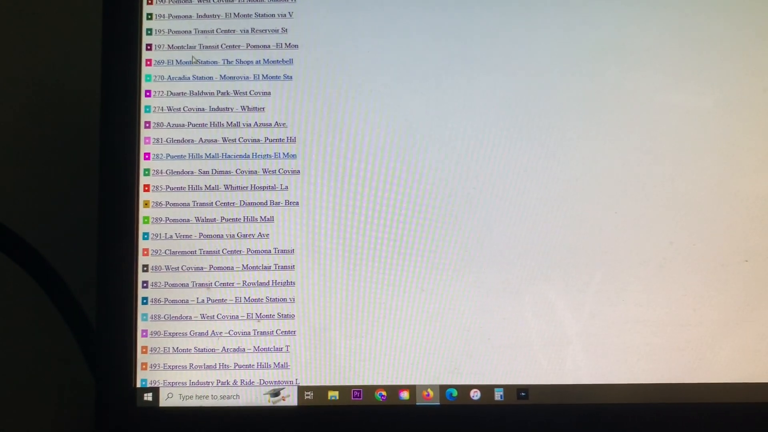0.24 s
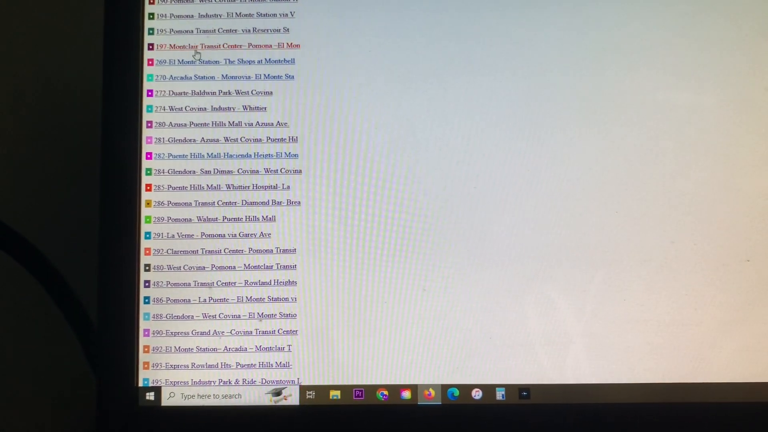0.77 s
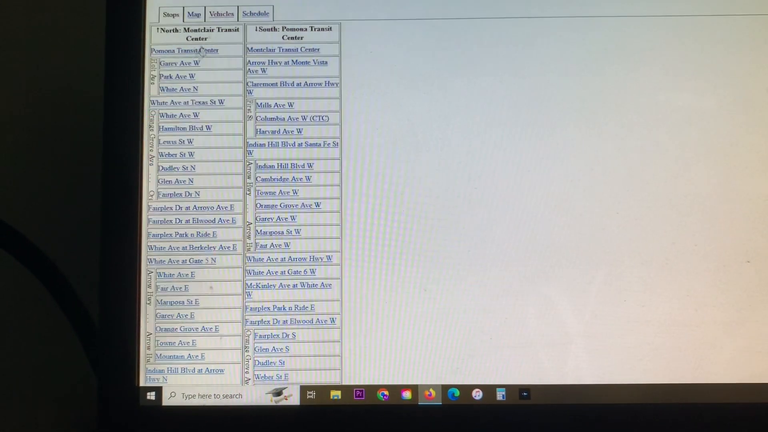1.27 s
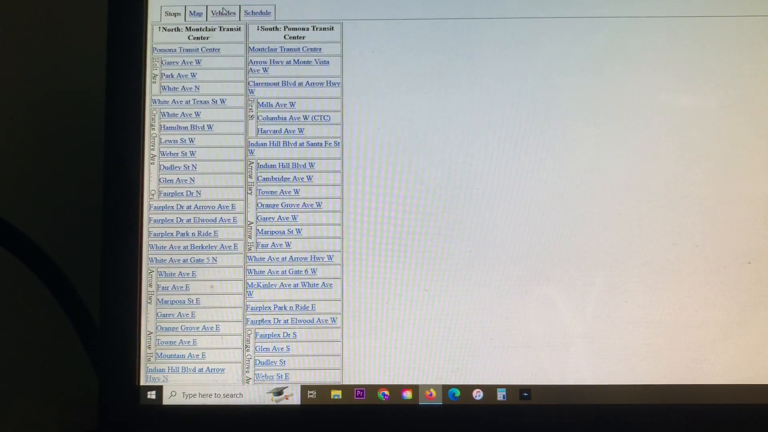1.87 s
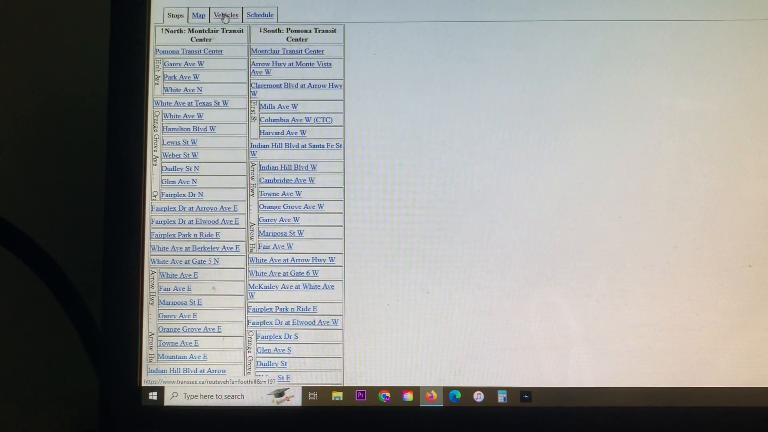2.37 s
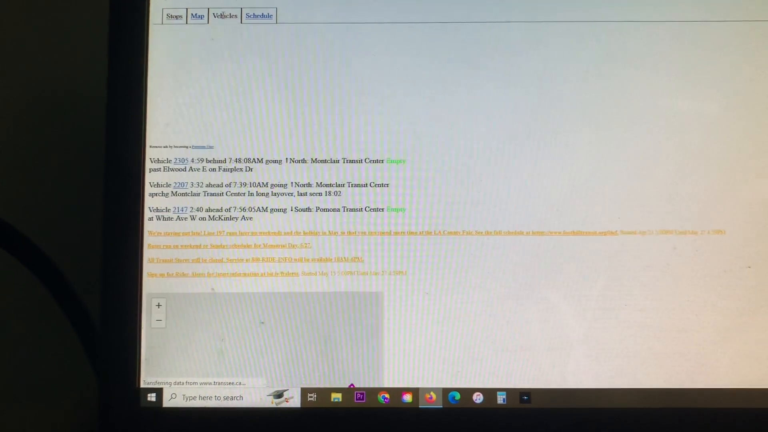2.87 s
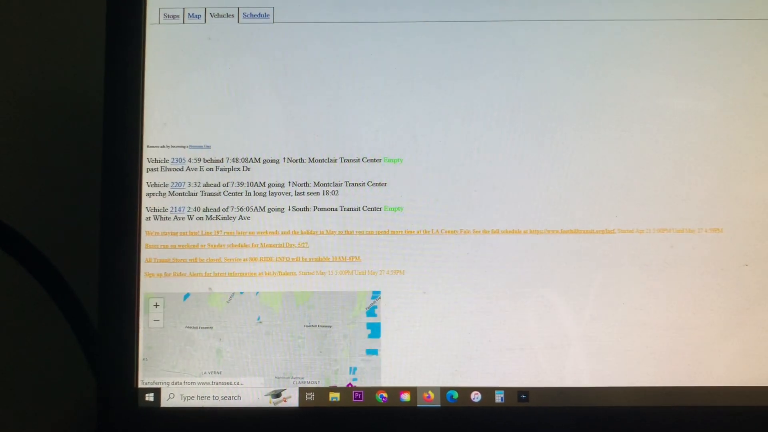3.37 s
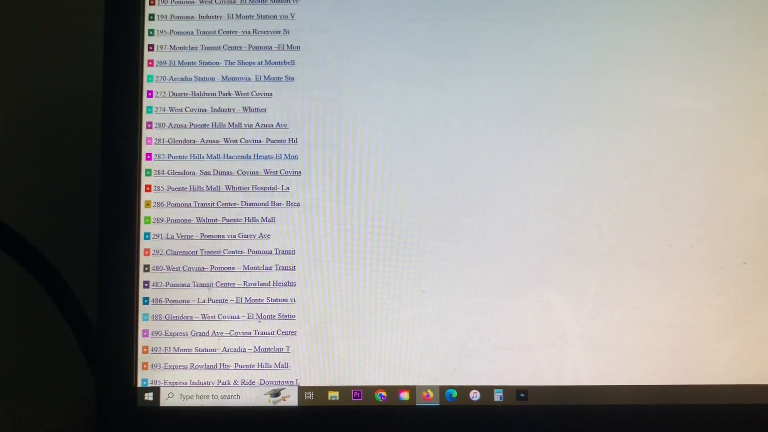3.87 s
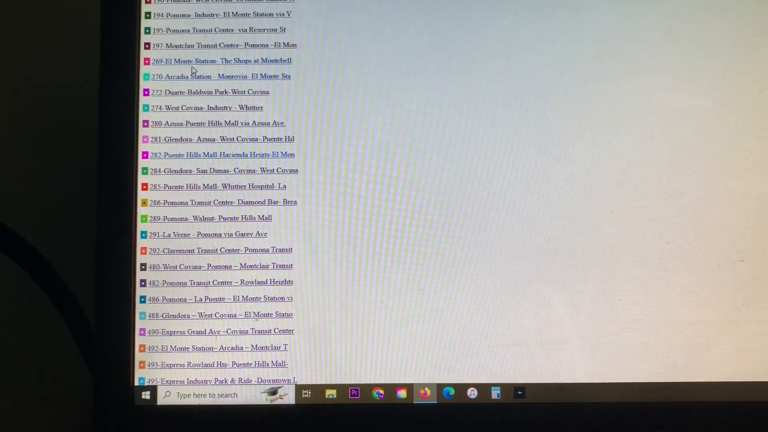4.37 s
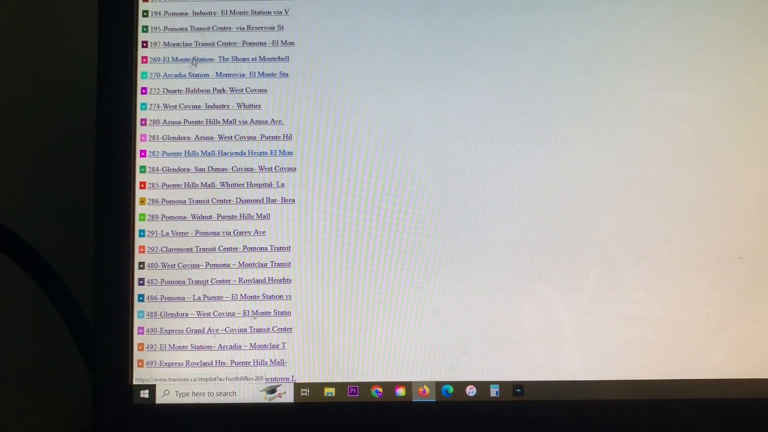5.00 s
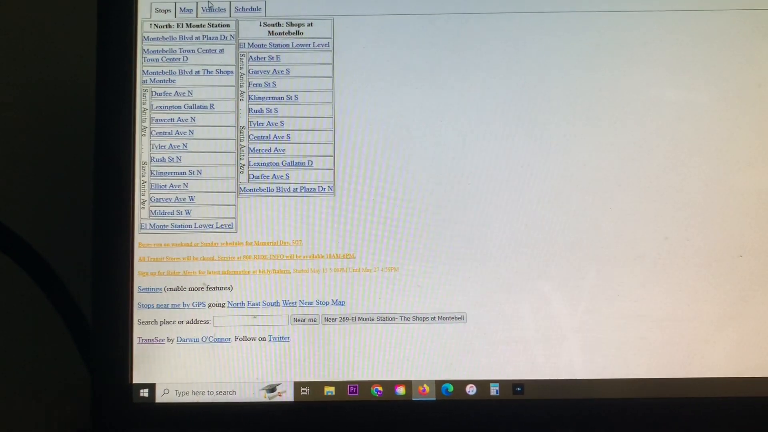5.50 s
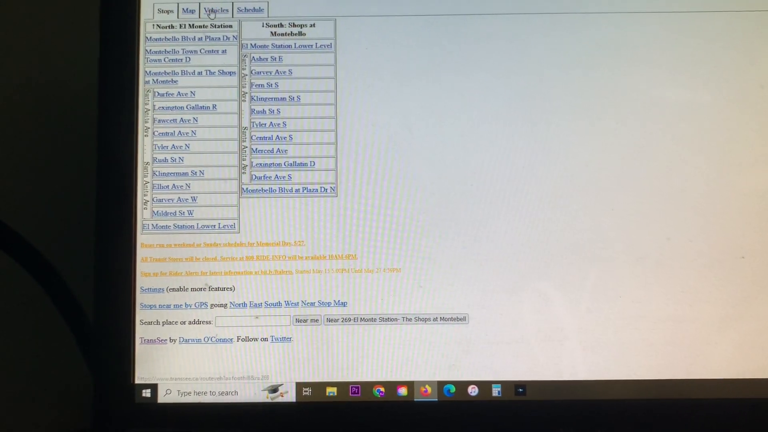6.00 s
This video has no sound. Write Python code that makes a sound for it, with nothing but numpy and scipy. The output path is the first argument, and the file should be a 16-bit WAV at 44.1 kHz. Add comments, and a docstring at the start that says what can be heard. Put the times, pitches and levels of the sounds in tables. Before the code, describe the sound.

Crisp computer mouse clicks, each a bright press and release pair, at irregular intervals over a steady low electrical hum in a small quiet room.

```python
"""On a desk in a small quiet room, right of a phone, a mouse button is pressed and let go ten times.
Each click is a chatter of switch contacts that rings banks of decaying modes, with cracks of noise on top.
Flat faces return duller copies and a noise-built room tail follows. Beneath lie soft desk slides,
a sine mains hum, fan noise with resonances, building rumble and a hiss with a dark top."""
import sys
import numpy as np
from scipy import signal
from scipy.fft import rfft, irfft
from scipy.io import wavfile
from scipy.ndimage import uniform_filter1d

SR = 44100
rng = np.random.default_rng(int(sys.argv[2]) if len(sys.argv) > 2 else 0)


def transcribe(u):
    """Save the signal u as a 16-bit wav file named by the first command-line argument.

    u: samples, shape (n,) or (channels, n), limited to [-1, 1]; the rate is SR.
    q: integer samples, one column per channel.
    """
    v = np.clip(np.atleast_2d(u).T, -1, 1)
    q = np.round(v * 32767).astype(np.int16)
    wavfile.write(sys.argv[1], SR, q)


N = 275625


def undb(db):
    """dB to amplitude gain."""
    return 10 ** (np.asarray(db) / 20)


def along(table, hz, order=1):
    """A table column read on a log-frequency axis."""
    rows = np.array(table, float)
    return np.interp(np.log(hz + 1), np.log(rows[:, 0]), rows[:, order])


def shape(x, gain):
    """Filter by a function of frequency, in the spectrum."""
    size = x.shape[-1]
    return irfft(rfft(x) * gain(np.arange(size // 2 + 1) * SR / size), size)


def band(hz, width_hz):
    """Response of one resonance, scaled so noise of unit power per Hz comes out with unit power."""
    return lambda f: np.sqrt(2 / np.pi / width_hz) / (1 + 2j * (f - hz) / width_hz)


def walk(rate, size=N):
    """Random levels held 1 / rate s and smoothed twice into slopes; spread near 1."""
    hold = int(SR / rate)
    steps = np.repeat(rng.standard_normal(size // hold + 1), hold)
    return 1.3 * uniform_filter1d(uniform_filter1d(steps, hold), hold)[:size]


# Each row: press start in seconds, switch level over the usual in dB, spring ring level in dB,
# shell level over the usual in dB, top modes over the usual in dB.
PRESSES = [(0.2877, 1, -35, 0, 0), (0.6556, 2, -31.5, 0.5, 0), (1.7069, -1, -33.5, 1, 1),
           (2.0103, -1, -34.5, -2, 2.5), (2.321, -1, -33, 0.4, 0.5), (3.5405, 0, -39, -0.2, -2),
           (3.6588, 1, -34, -6, 5), (4.4435, -0.5, -32.5, -1.5, 2.5), (5.482, 1, -38, -2.5, -0.5),
           (5.7038, 0.5, -32.5, -3, 2.5)]
# Each row: the same columns for letting go, then the chatter length in ms.
RELEASES = [(0.367, 0.8, -28.5, 0.1, 0.1, 2), (0.7363, 3, -29, 0.1, 0.1, 1.18),
            (1.8114, -2, -32, 0.1, 0.1, 0.54), (2.0816, 1, -38, 0.1, 0.1, 1.56),
            (2.383, 0.5, -30.5, 0.1, 0.1, 1.65), (3.6094, 0.8, -36, 0.1, 0.1, 1.9),
            (3.7199, 2.3, -30.5, 0.11, 0.1, 1.59), (4.524, 1.5, -31.5, 0.1, 0.1, 1.8),
            (5.5514, 0, -36.5, 0.1, 0.1, 1.47), (5.789, 0.7, -29, 0.1, 0.1, 1.2)]
PRESS_CHATTER_MS = 0.771
PATH_LAG = 5  # samples the click needs more to the left port


def mouse():
    """Lays every press and release at its time on two ports; also gives the pulse each sends into the room."""
    out, pulses = np.zeros((2, N + 4096)), []
    presses = [(*row, PRESS_CHATTER_MS) for row in PRESSES]
    for way, table in enumerate((presses, RELEASES)):
        for start_s, *levels in table:
            sound = click(way, *levels)
            i, length = int(start_s * SR), sound.shape[1]
            out[0, i + PATH_LAG:i + PATH_LAG + length] += sound[0]
            out[1, i:i + length] += sound[1]
            pulses.append((i, blurred(sound)))
    return out[:, :N], pulses


# Contacts of one snap, evenly spread over the chatter. Each row: level on press in dB, on release in dB.
CONTACTS_DB = [(-4, -1), (-0.5, -3), (0.1, -1.5), (-5, 1)]
# Modes of the mouse, by part: low knock, plastic shell, button, switch spring, switch leaf, top treble.
# Each row: centre in Hz, t60 in ms, relative level on press in dB, on release in dB,
# right port over left in dB.
KNOCK_MODES = [(800, 13.2, -0.5, 1.5, 6), (1297, 11.5, 4, -2, 0.29), (1490, 9, -7, -0.5, 0.1),
               (1964, 6.4, -22, -6, 0.5), (2320, 13, -8, -12, 1.5)]
SHELL_MODES = [(2230, 8.4, -15.5, -7.5, -2), (2790, 8.9, -10, -10, -4), (3528, 17.7, -2.5, -5.5, 4),
               (3670, 10, 0, -5, 2), (3970, 12, -6, -2, -4)]
BUTTON_MODES = [(4405, 7.4, -4, 0, 1), (4810, 7.3, -10.5, -3, 5), (5100, 7.2, -11.5, -6, 0),
                (5410, 7.8, -8, -6, 3), (5980, 7, -1.5, -5.5, 8), (6500, 9.6, -4.5, 0.5, 1.5),
                (7230, 13, -8.5, -3.5, 3)]
SPRING_MODES = [(8650, 6.4, 1.8, 2.8, 7.1)]
LEAF_MODES = [(9260, 6.2, -1.5, -3, 9.2)]
TOP_MODES = [(10800, 7, -1.5, -4.5, 0.026), (13130, 10, -17.5, -12, 0.0011),
             (13300, 5.5, -0.5, -8.5, 0.012), (13870, 3.4, -10, 4, 0.0071), (14860, 5.2, 0, 2, 0.015),
             (15240, 5.9, -19, -8, 0.014)]
# usual level of each part: (press dB, release dB)
KNOCK_DB, SHELL_DB, BUTTON_DB = (-58.5, -63.5), (-45.5, -55), (-47, -49.5)
LEAF_DB, TOP_DB = (-37.5, -34.5), (-37, -29.5)
# each later contact excites the crack and top modes this much less: (press, release)
SOFTER_DB = (-1.5, -3)


def click(way, switch_db, spring_db, shell_db, top_db, chatter_ms):
    """One snap (way 0 press, 1 release): chattering contacts strike the modes and crack."""
    t = np.arange(2048) / SR
    gains = undb(np.array(CONTACTS_DB)[:, way])
    delays_ms = np.linspace(0, chatter_ms, len(gains))
    contacts = [(np.maximum(t - ms / 1000, 0), gain) for ms, gain in zip(delays_ms, gains)]
    sharp = [(late, gain * undb(SOFTER_DB[way] * k)) for k, (late, gain) in enumerate(contacts)]

    sound = undb(TOP_DB[way] + switch_db) * sum(gain * crack(late) for late, gain in sharp)
    sound = sound + undb(TOP_DB[way] + top_db) * ring(TOP_MODES, way, sharp)
    parts = (
        (SPRING_MODES, spring_db),
        (KNOCK_MODES, KNOCK_DB[way] + switch_db),
        (SHELL_MODES, SHELL_DB[way] + shell_db),
        (BUTTON_MODES, BUTTON_DB[way] + switch_db),
        (LEAF_MODES, LEAF_DB[way] + switch_db),
    )
    for modes, part_db in parts:
        sound = sound + undb(part_db) * ring(modes, way, contacts)
    return sound


def ring(modes, way, contacts):
    """Contacts excite decaying sines; each mode keeps its energy however the phases meet. Rows: left, right."""
    hz, t60_ms, db, right_db = (np.array(modes)[:, [k]] for k in (0, 1, 2 + way, 4))
    chance = rng.standard_normal((len(modes), 2 + len(contacts)))
    hz = hz * (1 + 0.0063 * chance[:, :1])
    hits = []
    for k, (late, gain) in enumerate(contacts):
        phase = chance[:, [2 + k]]
        hits.append(gain * swell(late, t60_ms) * np.sin(2 * np.pi * hz * late + phase))
    wave = sum(hits)
    energy = sum(np.sum(hit ** 2, 1) for hit in hits)
    wave = wave * np.sqrt(energy / np.sum(wave ** 2, 1))[:, None]
    wave = wave * undb(db + 1.5 * chance[:, 1:2])
    left = np.sum(wave * undb(-right_db / 2), 0)
    right = np.sum(wave * undb(right_db / 2), 0)
    return np.array([left, right])


RISE_MS = 0.53  # time constant of the push


def swell(t, t60_ms):
    """The contact pushes for a moment, then the vibration dies exponentially."""
    push = (1 - np.exp(-t * 1000 / RISE_MS)) ** 2
    return push * np.exp(-np.log(1000) * t * 1000 / t60_ms)


# Colour of the snap noise. Each row: frequency in Hz, relative level in dB.
CRACK_COLOUR = [(300, -21), (700, 1), (1500, -7), (2500, -22), (5000, -20), (8000, 4.5), (12000, 6.5),
                (16000, -23)]
CRACK_DB, CRACK_T60_MS = -5, 8


def crack(t):
    """The broad snap of metal on metal: coloured noise under the contact's envelope."""
    noise = shape(rng.standard_normal(len(t)), lambda f: undb(CRACK_DB + along(CRACK_COLOUR, f)))
    return swell(t, CRACK_T60_MS) * noise


# Hard flat faces that return the click. Each row: delay in ms, left level in dB, right level in dB.
MIRRORS = [(4.6, -18, -19), (8.85, -11, -12), (12.5, -17, -19), (24.3, -19, -17)]
MIRROR_HZ = 9300  # the copies lose the treble above this


def mirrored(x):
    """The click and its delayed, duller copies from flat faces nearby."""
    dull = shape(x, lambda f: 1 / np.sqrt(1 + (f / MIRROR_HZ) ** 8))
    out = x
    for ms, left_db, right_db in MIRRORS:
        out = out + np.roll(dull, int(ms * SR / 1000), axis=1) * undb([[left_db], [right_db]])
    return out


BLUR_HZ = 240  # the room hears the mouse from all sides, so its peaks and dips even out over this width


def blurred(sound):
    """A short pulse with the energy of the click and its colour evened out."""
    power = np.mean(np.abs(rfft(sound)) ** 2, 0)
    bins = int(BLUR_HZ * sound.shape[1] / SR)
    even = uniform_filter1d(uniform_filter1d(power, bins), bins)
    return np.roll(irfft(np.sqrt(even + 1e-18)), 64)  # moved on so the pulse is whole


ROOM_SHARED = 0.4  # part of the tail's power that stays the same as hand and mouse move between clicks


def room(pulses):
    """Each click is convolved with a room answer that is partly the same, partly new."""
    out, shared = np.zeros((2, N + SR)), returns()
    for i, pulse in pulses:
        answer = np.sqrt(ROOM_SHARED) * shared + np.sqrt(1 - ROOM_SHARED) * returns()
        tail = signal.fftconvolve(pulse[None], answer, axes=1)
        out[:, i:i + tail.shape[1]] += tail
    return out[:, :N]


# Diffuse tail. Each row: frequency in Hz, level in dB before the common trim, t60 in seconds,
# right port over left in dB, first returns over the tail in dB.
ROOM_TAIL = [(523, -11, 0.26, -1.5, 0.5), (1510, -20, 0.31, 0.5, -4.5), (2580, -13, 0.16, 0, 8),
             (3570, -21.5, 0.25, -1, 3), (4350, -14.5, 0.31, -2, 3), (5840, -14.5, 0.2, 0, 4),
             (7480, -14, 0.24, 1.5, 3), (8570, -30.5, 0.22, 5, -3), (10900, -18.5, 0.21, -0.5, 2.5),
             (13600, -27.5, 0.17, 1, 3), (16300, -37, 0.13, 0, 5)]
TRIM_DB = -12
EARLY_T60_S, BUILD_S = 0.045, 0.003  # the first returns from desk and hand
GRAIN_DB, GRAIN_PER_S = 2.8, 600  # the tail arrives in uneven clumps of reflections


def returns():
    """One room answer: quick first returns, then a dense tail fading band by band; each port hears its own."""
    t = np.arange(int(.3 * SR)) / SR
    build = 1 - np.exp(-(t / BUILD_S) ** 2)
    response = 0
    for hz in 500 * 2 ** np.arange(0, 5.1, 1 / 3):  # third-octave steps
        noise = rng.standard_normal((2, len(t)))
        third = shape(noise, lambda f: np.cos(np.pi / 2 * np.clip(3 * np.log2((f + 1) / hz), -1, 1)))
        late = undb(-60 * t / along(ROOM_TAIL, hz, order=2))
        early = undb(along(ROOM_TAIL, hz, order=4) - 60 * t / EARLY_T60_S)
        level_db = along(ROOM_TAIL, hz) + TRIM_DB + along(ROOM_TAIL, hz, order=3) * np.array([[0], [1]])
        grain_db = GRAIN_DB * walk(GRAIN_PER_S, size=len(t))
        response = response + third * build * np.hypot(late, early) * undb(level_db + grain_db)
    return response


# Likeness of the ports. Each row: frequency in Hz, correlation from 0 to 1.
ALIKE = [(60, 0.91), (300, 1), (640, 0.87), (1400, 0.11), (4000, 0.086), (16000, 0.13)]


def pair():
    """Noise of unit power per Hz at two ports, alike in the bass, mixed from a mid and a side."""
    mid, side = rng.standard_normal((2, N)) * np.sqrt(SR / 2)
    mid = shape(mid, lambda f: np.sqrt(1 + np.clip(along(ALIKE, f), 0, 1)))
    side = shape(side, lambda f: np.sqrt(1 - np.clip(along(ALIKE, f), 0, 1)))
    return np.array([mid + side, mid - side]) / np.sqrt(2)


# Soft slides of the mouse over the desk. Each row: start in seconds, length in seconds,
# level of the push at its height in dB.
SLIDES = [(1.05, 0.2, -89), (2.55, 0.69, -85), (5.15, 0.21, -84), (6.0, 0.2, -95)]
SLIDE_HZ, SLIDE_WIDTH_HZ, SLIDE_ROUGH_DB = 1200, 1200, 7.5


def slides():
    """A faint scuff: band noise that swells and fades, with a rough, uneven level."""
    t = np.arange(N) / SR
    push = sum(undb(db) * np.sin(np.pi * np.clip((t - s) / length, 0, 1)) for s, length, db in SLIDES)
    scuff = shape(pair(), lambda f: band(SLIDE_HZ, SLIDE_WIDTH_HZ)(f) / (1 + (f / 2500) ** 4))
    return scuff * push * undb(SLIDE_ROUGH_DB * walk(60))


HUM_HZ, HUM_DB, HUM_LEFT_DB = 119.97, -43.5, 1.03  # the last is left over right


def hum():
    """Twice the mains frequency from a transformer: a sine, all but steady in phase and level."""
    phase = 2 * np.pi * HUM_HZ * np.arange(N) / SR + 0.012 * walk(1.6)
    sides_db = np.array([[HUM_LEFT_DB], [-HUM_LEFT_DB]]) / 2
    return np.sqrt(2) * np.sin(phase) * undb(HUM_DB + 0.01 * walk(2.4) + sides_db)


# Broad air noise. Each row: frequency in Hz, density in dB per Hz before swell, drift and balance.
FAN_AIR = [(60, -112), (100, -77.5), (160, -86.5), (300, -92.5), (400, -97.5), (480, -106), (900, -111),
           (1400, -113), (2500, -120), (4500, -125), (7000, -140)]
# Resonances in the fan noise. Each row: centre in Hz, width in Hz,
# rms level in dB before waver, flicker, drift and balance.
WHIRR = [(208.7, 3.4, -81), (255.5, 9, -72), (330.5, 10, -74.5), (536, 17, -87.5), (600.5, 24, -84.5),
         (1269, 72, -94), (908, 10, -95), (3500, 26, -99), (3692, 33, -90.5), (3883, 88, -88),
         (3940, 280, -85), (11800, 300, -101)]
# Drift of the low band. Each row: time in seconds, level in dB, of which only the change about the mean counts.
FAN_LOW = [(0.0, -69), (0.47, -65), (0.76, -66), (1.4, -67), (2.1, -64.5), (2.6, -66), (3.16, -66),
           (3.52, -65), (3.92, -67), (6.2, -67.5)]
# Balance of the ports. Each row: frequency in Hz, left over right in dB.
FAN_LEFT = [(60, .5), (400, 0), (1300, 2.5), (4400, 1.5), (7000, 0)]
FAN_SWELL_DB, WHIRR_FLICKER_DB, WHIRR_WAVER_DB = 1.4, 2, 1.9


def fan():
    """Air noise that swells slowly, with resonances that flicker alone; the low band drifts in level."""
    out = shape(pair(), lambda f: undb(along(FAN_AIR, f))) * undb(FAN_SWELL_DB * walk(2.5))
    for hz, width_hz, db in WHIRR:
        level_db = db + WHIRR_WAVER_DB * walk(2) + WHIRR_FLICKER_DB * walk(9)
        out = out + shape(pair(), band(hz, width_hz)) * undb(level_db)
    low = shape(out, lambda f: 1 / (1 + (f / 480) ** 4))
    low_db = np.interp(np.arange(N) / SR, *np.transpose(FAN_LOW))
    out = out + low * (undb(low_db - np.mean(low_db)) - 1)
    return shape(out, lambda f: undb(np.array([[1], [-1]]) * along(FAN_LEFT, f) / 2))


# Building rumble. Each row: time in seconds, level in dB before the waver.
RUMBLE = [(0.0, -69), (0.05, -66), (0.28, -76), (0.31, -66), (0.66, -70), (0.7, -59), (1.04, -67.5),
          (2.49, -63), (2.54, -54), (2.63, -67), (2.68, -53), (2.79, -75), (3.03, -64), (3.25, -67),
          (3.29, -58.5), (4.42, -69), (4.63, -67), (5.15, -74), (5.19, -62), (5.33, -67), (6.16, -69),
          (6.25, -66)]
RUMBLE_WAVER_DB = 1.5


def rumble():
    """Low swells carried by the building: bass noise on a level curve, wavering quickly on its way."""
    low = shape(pair(), lambda f: band(52, 40)(f) * f ** 2 / (f ** 2 + 45 ** 2) / (1 + (f / 95) ** 4))
    level_db = np.interp(np.arange(N) / SR, *np.transpose(RUMBLE)) + RUMBLE_WAVER_DB * walk(6.8)
    return low / np.sqrt(np.mean(low ** 2)) * undb(level_db)


def scene():
    """Clicks with their room over slides, hum, fan and rumble."""
    direct, pulses = mouse()
    return mirrored(direct) + room(pulses) + slides() + hum() + fan() + rumble()


# Hiss, falling away steeply above 14.5 kHz. Each row: frequency in Hz, density in dB per Hz.
HISS = [(2500, -135), (5000, -123.5), (7200, -124.2), (8000, -123), (11500, -122.5), (14300, -125),
        (14800, -136), (15900, -150)]
ONE_PORT_HZ = (6330, 10800)  # over this range the right channel turns into a copy of the left port
CHANNEL_LAG, TOP_HZ = 13, 16350  # left delay in samples, top cutoff


def record(dry):
    """Adds hiss with a dark top, takes both channels' treble from one port, delays the left, cuts the top."""
    def share(f):
        return np.interp(f, ONE_PORT_HZ, (0, 1))

    dry = dry + shape(pair(), lambda f: undb(along(HISS, f)))
    right = shape(dry[1], lambda f: np.sqrt(1 - share(f) ** 2)) + shape(dry[0], share)
    out = np.array([np.roll(dry[0], CHANNEL_LAG), right])
    return signal.sosfilt(signal.ellip(10, .2, 80, TOP_HZ, fs=SR, output="sos"), out)


dry = scene()
out = record(dry)
transcribe(out)
```